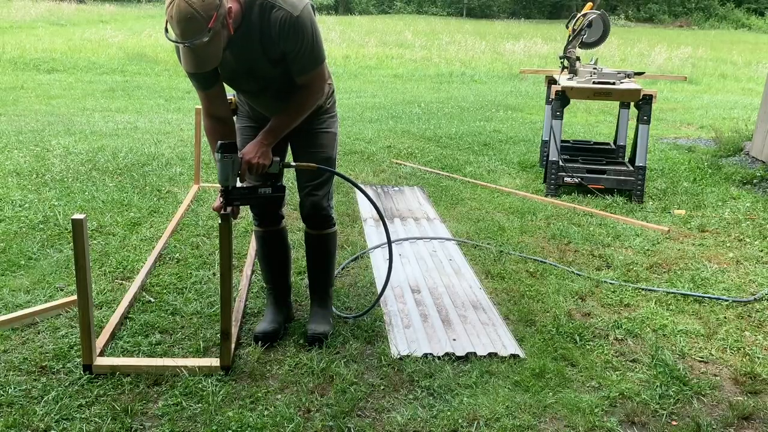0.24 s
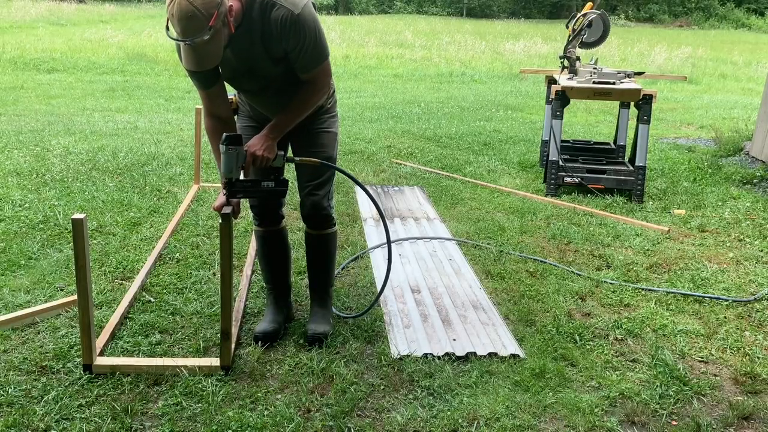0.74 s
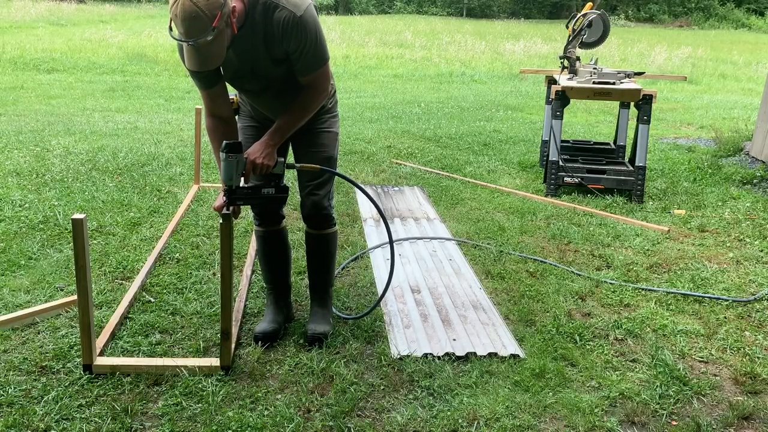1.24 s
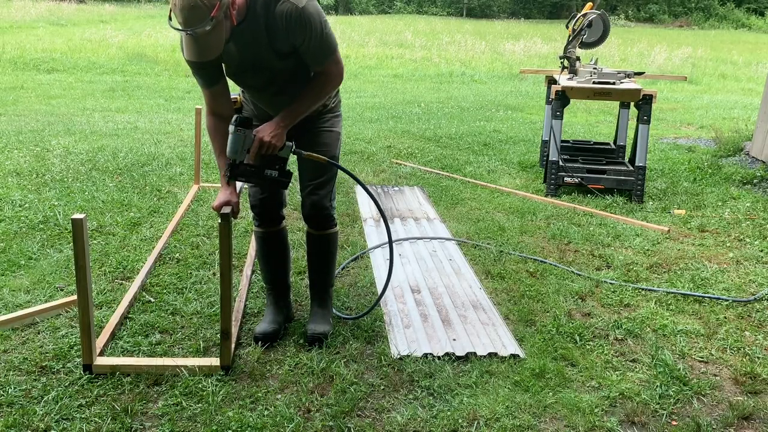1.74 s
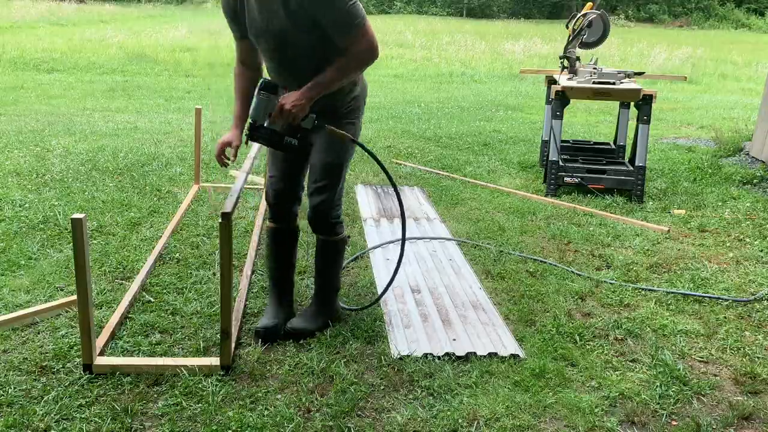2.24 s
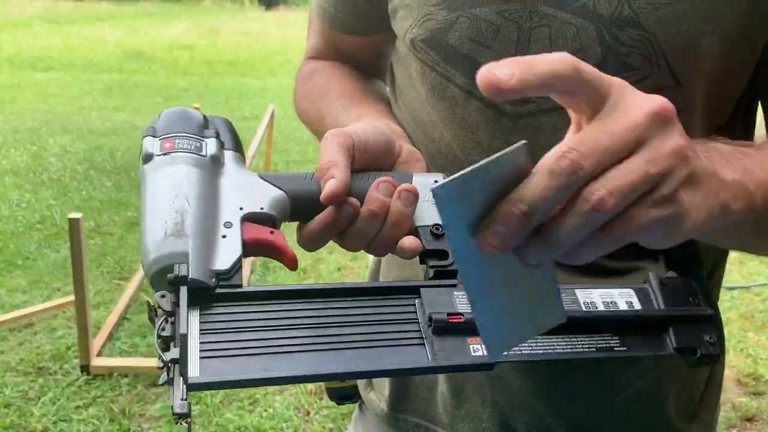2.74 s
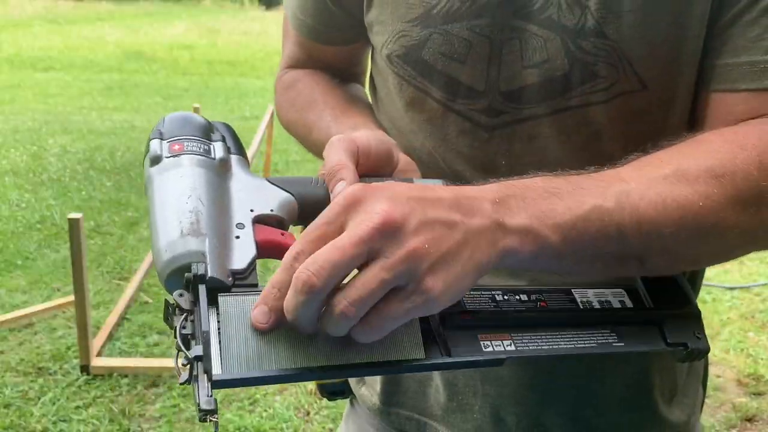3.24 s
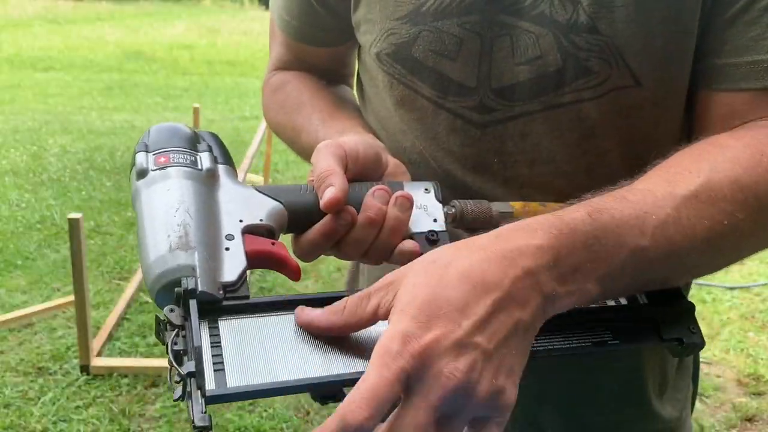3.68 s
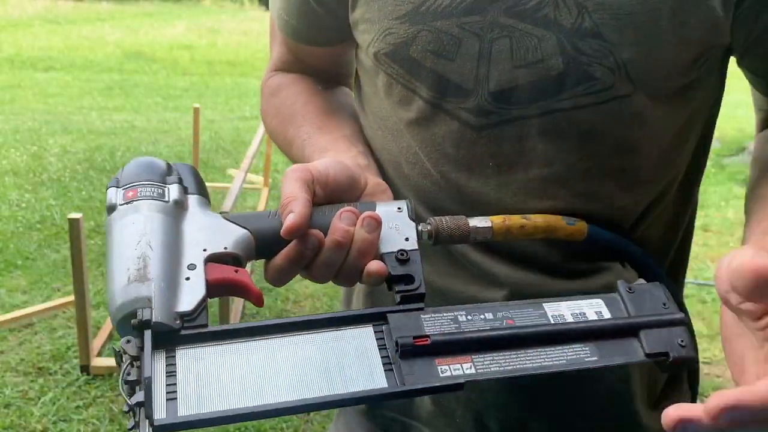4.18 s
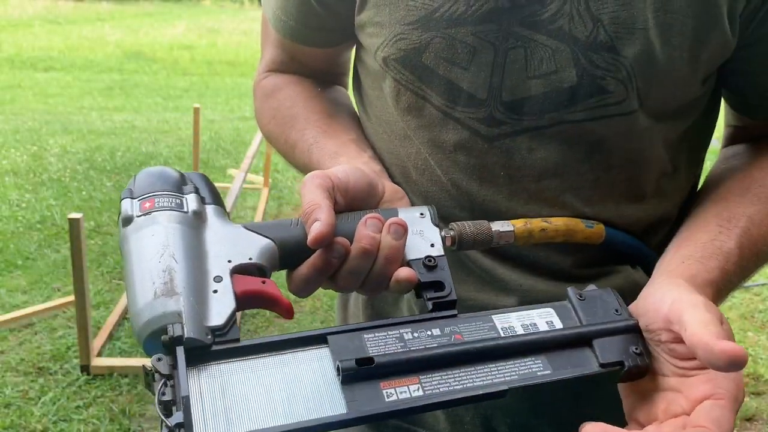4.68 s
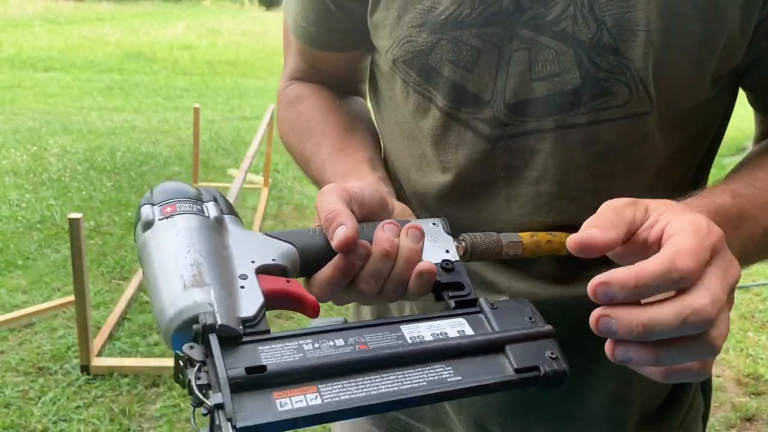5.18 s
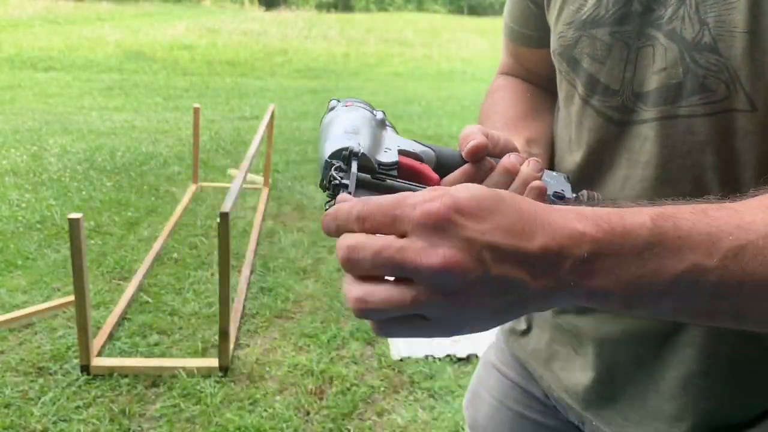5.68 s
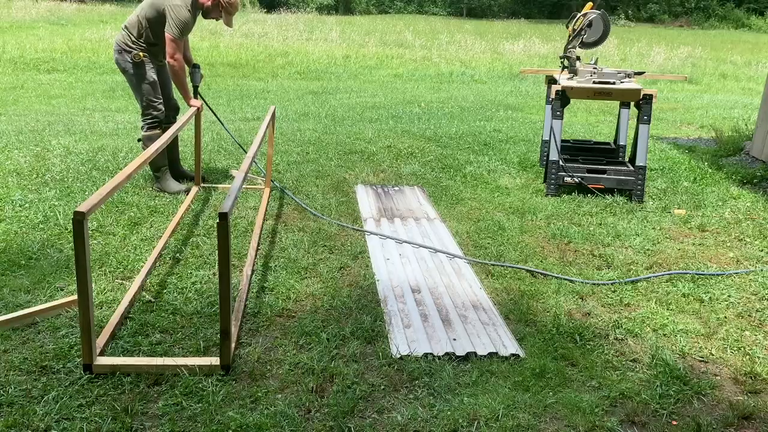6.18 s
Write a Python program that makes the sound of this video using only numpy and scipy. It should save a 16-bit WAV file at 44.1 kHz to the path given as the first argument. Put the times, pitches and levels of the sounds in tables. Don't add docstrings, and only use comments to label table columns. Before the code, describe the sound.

In a breezy open yard an air nailer fires twice into a thin wooden frame, about a second apart, each a crack and woody knock followed by a sharp burst of escaping air. A cut goes close to the tool over a low engine drone: a nail strip rattles in, snaps home, a catch clicks and the magazine slides shut with a slam. Faint birds chirp; then quieter open yard. Stereo microphone, buffeted by wind.

```python
import sys
import numpy as np
from scipy import signal
from scipy.fft import rfft, irfft, next_fast_len
from scipy.io import wavfile
from scipy.ndimage import map_coordinates

SR = 44100
rng = np.random.default_rng(int(sys.argv[2]) if len(sys.argv) > 2 else 0)


def boost(x):
    u = np.asarray(x, float) / 20
    return 10 ** u


def output_pcm(signal):
    pcm = np.clip(np.atleast_2d(signal).T, -1, 1) * 32767
    wavfile.write(sys.argv[1], SR, np.round(pcm).astype(np.int16))


N = 283195
T = np.arange(N) / SR
FIRST_FEED = [[1], [0]]

# (time [s], level [dB], half width [s])
PUFFS = [(.02, -50.5, 0.14), (.19, -39.5, 0.047), (.35, -46, 0.044), (0.449, -41, 0.026),
         (.605, -41, 0.017), (.87, -48, 0.045), (1.13, -56.5, 0.073), (1.27, -52, 0.034),
         (1.39, -46, 0.017), (1.5, -38, 0.043), (1.66, -44, .05), (1.86, -46.5, 0.023),
         (2.001, -48.5, 0.12), (2.44, -46.5, 0.05), (6.15, -62, 0.046)]
CALM_DB = -63.5
# (time [s], level [dB], pitch [Hz], t60 [s])
GUSTS = [
    (.075, -40, 105, .08),
    (.2, -34, 130, .05),
    (.212, -40, 215, .04),
    (1.85, -42, 85, .07),
    (2.025, -37, 90, .08),
    (2.035, -43, 170, .04),
    (2.37, -52, 300, .06),
]
# (time [s], level [dB])
BREEZE = [(0, 1.5), (.45, 0), (.95, 2.5), (1.2, 0), (1.5, 0), (1.95, -5), (2.25, -7.5), (2.4, -5.5),
          (2.65, -5), (2.95, 1), (3.4, 1), (4.2, 1), (4.9, 3.5), (5.3, 2), (5.75, 3.5), (6.42, 3.5)]
GRASS_SWAYS, ROAD_SWAYS, AIR_SWAYS = 0.868, 0.81, 1
# (from [s], leaves [dB], road [dB], grass [dB], air [dB])
BEDS = [
    (0, -60, -70.5, -71, -74.5),
    (2.5, -60, -61, -76.5, -76.5),
    (5.96, -64, -74, -72, -78),
]
# (frequency [Hz], level per Hz [dB])
RUMBLE = [(18, -43.5), (35, -3), (60, 6.5), (100, -2), (180, -17), (300, -23), (600, -53)]
LEAVES = [(60, -8.5), (150, -0.5), (350, -2), (500, -14), (1000, -39)]
ROAD = [(300, -21), (600, -2), (950, 1), (1300, -6.5), (1800, -10), (2600, -37.5)]
GRASS = [(500, -12.5), (1200, 5), (2600, 4.5), (4300, -8.5), (5500, -9), (8000, -20), (12000, -36.5)]
AIR = [(2500, -4.5), (5000, 5), (7000, -1.5), (9000, -3.5), (11000, -5.5), (13000, -14), (16000, -11.5)]
# (time [s], level [dB])
ENGINE = [(2.5, -52), (2.95, -51.5), (3.3, -43.5), (3.75, -42), (4.0, -42), (4.12, -50.5), (4.3, -40),
          (4.45, -48), (4.62, -42.5), (4.72, -49.5), (4.95, -41), (5.1, -44.5), (5.42, -42.5),
          (5.49, -52.5), (5.56, -42.5), (5.92, -48.5)]
# (pitch [Hz], width [Hz])
DRONE = (71.7, 6.7)
# (time [s], bass [dB], treble [dB])
DUCKS = [
    (.6, -15.5, -5),
    (1.64, -5, -4),
    (3.2, -1, -6),
    (4.78, -24, -17),
]
RECOVER_T60_S = 0.44
# (time [s], level [dB])
RETURNS = [
    (0.599, -46.5),
    (1.64, -48),
    (4.33, -60.5),
    (4.45, -64.5),
    (4.77, -57.5),
]
RETURN_T60_S = 0.94
# (level [dB], rise [s], hold [s], t60 [s])
SWISH = (-56, 0.2, 0.1, .25)
SWISH_S = 4.3

# (valve opens [s], valve [dB], blow [dB], trigger released [s], exhaust [dB])
SHOTS = [
    (0.433, -23, -11, .594, -17),
    (1.487, -22.5, -10, 1.631, -16),
]
STROKE_S = .0273
# (time [s], level [dB], hold [s], port snap [dB])
SPITS = [
    (0.597, -20.5, .02, -19),
    (1.629, -29, 0.028, -25),
]
# (frequency [Hz], width [Hz], level [dB])
FRAME = [(390, 110, -3), (980, 130, 2.5), (1600, 250, -3.5), (660, 120, -8), (2900, 200, -12)]
LATE_CYCLES = 1.3
# (frequency [Hz], width [Hz], level [dB])
PORT = [(2770, 47, -4.5), (3500, 83, -10.5), (4210, 69, -6), (4590, 68, -9), (5240, 26, -7), (5850, 41, -6),
        (7060, 43, -3.5), (7550, 49, -0.5)]
# (frequency [Hz], level per Hz [dB])
VALVE = [(300, -30), (1000, -16), (2600, -9), (3800, -12.5), (7000, -6), (9000, 4.5), (13000, -5.5),
         (16000, -4)]
CRACK = [(100, -6), (1000, -2), (2600, -4), (5200, -11.5), (8500, 4), (11000, -4.5), (16000, -7.5)]
YARD = [(100, -14.5), (350, -4), (700, -7), (1300, -7), (2600, 1.5), (5200, -4), (9000, -8.5),
        (16000, -14.5)]
EXHAUST = [(150, -16.5), (350, -14.5), (1200, -23), (2600, -2), (5200, -9.5), (9000, 6.5), (11000, 1),
           (16000, -1)]

# (time [s], peak [dB], hollow part [dB])
NUDGES = [
    (0.926, -45, -8),
    (0.935, -57, -1),
    (0.971, -50, -5),
    (1.092, -45.5, -27),
    (1.115, -40.5, -8),
    (1.1563, -49, -1),
    (1.248, -45, -9),
    (1.253, -42, -12),
    (2.2784, -62, -3.5),
]
NUDGE_T60_S, NUDGE_RING_DB = 0.044, -27.5
# (time [s], peak [dB], hollow part [dB], strip ring [dB])
RATTLES = [(2.864, -28.5, 2.5, -5.5), (2.9104, -37.5, -5.5, -2.5), (2.9706, -39, -1, -8),
           (2.979, -34, -2, -5), (3.0187, -44, 6, 4), (3.021, -42, -6, 1), (3.025, -29, -4, 3),
           (3.035, -33, 0.5, -38), (3.059, -33, -18, -2), (3.067, -46, 7, -18), (3.16, -34, 7, -16),
           (3.1815, -40, -40, -21), (3.1975, -29.5, -9, -32), (3.2022, -22, -4, -41),
           (3.148, -42, -6, -14.5), (3.189, -44, -19, -19)]
RATTLE_T60_S = 0.015
# (time [s], peak [dB], hollow part [dB])
CLICKS = [(3.6566, -13, -9.5), (4.2962, -26.5, -15), (4.3099, -13, -15), (4.329, -16, -6.5),
          (4.3445, -23.5, -9), (4.436, -29, -28), (4.4573, -29.5, -26), (4.462, -27, -32),
          (4.486, -40, -17), (4.5318, -34, -13), (4.539, -35, -8), (4.545, -40, -18), (4.552, -41, -14),
          (4.592, -31, -18), (4.601, -34, -7), (5.537, -46, 6.5), (5.868, -42, -27), (4.5117, -36, -27.5),
          (4.6204, -37, -6), (4.7238, -35, -16), (4.7298, -22.5, -9), (4.7762, -15.5, -4.5),
          (4.8048, -33.5, -9.5), (5.2625, -48, -15.5), (5.665, -38.5, -19)]
CLICK_T60_S, CLICK_RING_DB = 0.023, -28
# (time [s], bright [dB], hollow part [dB], length [s])
RUBS = [(2.228, -69, -11, 0.069), (2.57, -73.5, -19, 0.035), (2.664, -70.5, -15, 0.074),
        (2.741, -67.5, -22, 0.088), (2.912, -59, -8, 0.086), (3.068, -47, -7, 0.075),
        (3.133, -39.5, -21, 0.06), (3.578, -60.5, -7, 0.089), (3.852, -55.5, -10, 0.089),
        (4.364, -39, -10, .105), (4.503, -34, -12.5, 0.071), (4.581, -35, -22, 0.024),
        (4.668, -61, -22.5, .014), (5.163, -60.5, 15.5, 0.044), (5.505, -63.5, 17, 0.093),
        (5.59, -67, 9.5, 0.082), (5.855, -45, -15.5, 0.021)]
RUB_RISE, RUB_T60_S = 0.34, 0.022
# (time [s], bright [dB], hollow part [dB], length [s])
SCRAPES = [
    (2.986, -64, 6, 0.024),
    (3.23, -68, 3, 0.031),
    (3.637, -54.5, -20.5, .012),
    (3.679, -54, -4, 0.044),
    (4.299, -36.5, -2, 0.059),
    (4.48, -38, -19, 0.0068),
]
SCRAPE_RISE_S, SCRAPE_DIES = 0.0059, 2.75
# (time [s], bright [dB], hollow part [dB])
SLIDE = [
    (4.701, -65, 2),
    (4.715, -41, -2.5),
    (4.73, -24.5, -6),
    (4.76, -21, -1.5),
    (4.775, -20, -1.5),
    (4.788, -20, 4.5),
    (4.791, -54.5, 2),
    (4.815, -40.5, 3),
    (4.85, -72, 1),
]
# (time [s], level [dB], pitch [Hz], t60 [s])
STOP = [
    (4.7772, 5, 2600, .0014),
    (4.7845, -11, 1900, .004),
    (4.7872, -9, 3000, .003),
    (4.79, -15, 900, .006),
    (4.7775, -12, 1300, .006),
    (4.771, -16, 7150, .05),
    (4.783, -17, 6980, .03),
    (4.786, -24, 360, .025),
    (4.788, -20, 200, .03),
]
# (time [s], level [dB], pitch [Hz], t60 [s])
SEAT = [(3.657, -17, 1770, .03), (4.3103, -19, 4400, .025), (3.657, -16, 5610, .018),
        (3.657, -20, 6180, .03), (4.3103, -14, 5150, .04), (4.3103, -17, 7300, .02),
        (4.3103, -16, 6420, .025), (2.865, -38, 1950, .06), (3.026, -38, 1720, .03),
        (3.037, -40, 1800, .02), (3.161, -37, 1760, .025), (3.657, -18, 7000, .02), (4.329, -22, 1900, .03),
        (4.462, -27, 7100, .02), (4.329, -22, 5150, .05), (4.2965, -27, 4300, .02), (5.19, -56, 10200, .06),
        (5.665, -44, 6600, .015), (4.332, -30, 2500, .06), (4.345, -33, 2550, .09)]
# (frequency [Hz], level per Hz [dB])
STEEL = [(1500, -39), (4000, -19), (5800, -6), (7000, -1.5), (9000, 3), (11000, -1), (13000, -7.5),
         (16000, -7.5)]
SHELL = [(200, -23.5), (550, -15.5), (900, -7), (1700, -3.5), (2600, 1), (3800, -1.5), (6000, -11),
         (9000, -40.5)]
# (frequency [Hz], width [Hz], level [dB])
MAGAZINE = [(4300, 3300, -5.5), (5240, 34, 2.5), (6350, 18, -6), (7016, 57, 3), (8500, 250, 5),
            (11100, 149.5, -9.5), (11960, 78, -10)]
# (frequency [Hz], width [Hz], level [dB])
HOUSING = [(1017, 1900, -15), (1314, 91, 7), (1810, 260, 2.5), (2577, 56, 1)]
# (frequency [Hz], width [Hz], level [dB])
STRIP = [(9830, 45, 0), (10350, 70, -9)]
# (frequency [Hz], width [Hz], level [dB])
DRAG = [(1630, 220, -4.5), (4420, 300, -5.5), (5000, 220, -4), (5900, 220, -2.5), (7500, 230, -22),
        (10000, 150, 1)]

# (time [s], length [s], start [Hz], end [Hz], level [dB])
GLIDES = [(1.855, 0.021, 1910, 2250, -50), (3.787, 0.015, 4050, 3350, -59), (3.795, .065, 4400, 4750, -71),
          (3.862, 0.028, 3280, 3900, -56), (3.886, .022, 3900, 3500, -63), (4.012, .03, 5150, 5350, -61),
          (4.036, .017, 5350, 4450, -57), (4.06, .06, 5250, 5300, -70), (3.724, .036, 4600, 5000, -61),
          (3.756, .04, 4950, 4400, -63), (5.255, .025, 6950, 6850, -66), (6.12, .03, 2000, 2080, -66),
          (5.293, 0.075, 5250, 4980, -66), (5.431, .06, 5770, 5970, -63.5), (5.455, 0.046, 6150, 6240, -68),
          (5.552, .025, 4654, 4140, -57), (5.703, 0.079, 5670, 5970, -58), (5.759, 0.048, 6260, 6260, -66),
          (5.78, 0.08, 5764, 5800, -71), (5.84, 0.028, 3930, 3050, -62), (5.879, 0.085, 2837, 4770, -58.5),
          (5.882, 0.036, 3970, 4540, -58)]
# (time [s], length [s], top [Hz], end [Hz], level [dB])
ARCHES = [
    (3.914, .022, 4050, 3650, -56),
    (3.952, 0.046, 5300, 3350, -59.5),
]
ARCH_FROM = .87
# (time [s], level [dB], rise [s], hold [s], t60 [s])
INSECT = [
    (2.5, -62.5, 0.012, 0.022, 0.6),
    (3.3, -79.5, 0.053, 0.26, 0.27),
]

# (frequency [Hz], likeness [-1..1])
NEAR = [(300, 0.81), (1700, 0.75), (2500, 0.37), (3050, 0.67), (4000, 0.27), (5500, 0.071), (6800, 0.7),
        (7700, .8), (8250, .97), (8600, .997), (8900, .96), (9400, .82), (10200, .82), (10850, .995),
        (11400, .9), (12300, .68), (12900, .82), (13450, .995), (14000, .72), (14900, .68), (15500, .98),
        (16000, 0.99)]
# (frequency [Hz], likeness [-1..1])
FAR = [(100, 0.95), (350, 0.89), (1000, 0.053), (5500, 0.085), (7000, 0.68), (8600, 0.66), (9600, 0.95),
       (11000, 0.24), (12300, 0.54), (13500, 0.89), (16000, 0.96)]
# (frequency [Hz], likeness [-1..1])
STEADY = [(300, .75), (1500, .5), (2000, .6), (2450, .85), (2700, .93), (3400, .93), (3700, .3)]
# (frequency [Hz], lead [cycles])
LEAD = [(0, 0), (1000, -.08), (2200, -.2), (3050, -.5), (5500, -.5), (6150, 0), (8250, .48), (8850, .52),
        (10650, .99), (11250, 1.01), (13200, 1.48), (13700, 1.52), (15450, 1.99), (16500, 2)]
# (frequency [Hz], lead [cycles])
STEADY_LEAD = [(0, 0), (1500, -.2), (2000, -.33), (2450, -.44), (2700, -.46), (3450, -.5)]
# (frequency [Hz], level [dB])
TILT = [(300, 0), (2300, 0), (3600, 0), (5000, -4), (6500, -1), (8000, 0), (16000, 0)]
# (from [s], to [s], stretch of the port pattern with bearing [ratio])
HELD = [
    (.6, .76, 1.01),
    (1.644, 1.77, 1.06),
    (3.062, 3.198, .92),
]
# (from [s], to [s], low [Hz], high [Hz])
NULLS = [(.605, .66, 2750, 3350), (.66, .745, 3220, 3420), (.605, .63, 2200, 2400), (.63, .72, 2130, 2260),
         (.605, .64, 4480, 4680), (.605, .63, 4880, 5000), (1.648, 1.682, 2950, 3600),
         (1.682, 1.765, 3080, 3280), (1.648, 1.658, 4500, 5100), (1.648, 1.682, 5050, 5280),
         (1.68, 1.706, 5280, 5680), (3.064, 3.1, 2650, 3000), (3.095, 3.145, 2380, 2720),
         (3.14, 3.165, 2780, 3250), (3.158, 3.176, 3100, 3700), (3.172, 3.198, 2480, 2850),
         (3.87, 3.96, 2900, 3150), (4.365, 4.45, 5330, 5520), (4.367, 4.41, 12900, 13600),
         (4.39, 4.446, 13400, 14300), (4.73, 4.76, 5330, 5520), (2.922, 2.94, 3050, 3200),
         (3.72, 3.76, 2650, 2800)]
NULL_SKIRT_HZ = 70
# (from [s], to [s])
CLOSE = (2.5, 5.96)
# (time [s], half width [s], level [dB])
CUTS = [
    (2.501, 0.014, -16),
    (4.89, 0.0586, 1.5),
    (5.972, 0.015, -21),
]


def along(points, hz):
    f, v = np.transpose(points)
    return np.interp(np.log(hz + 1), np.log(f + 1), v)


def unit(x):
    return x / np.sqrt(np.mean(x ** 2) + 1e-20)


def curves(rows):
    s, *cols = np.transpose(rows)
    return [np.interp(T, s, c) for c in cols]


def wobble(rate):
    return map_coordinates(rng.standard_normal(int(N * rate / SR) + 4), [T * rate])


def filtered(x, response):
    m = next_fast_len(N + 8192)
    return irfft(rfft(x, m) * response(np.fft.rfftfreq(m, 1 / SR)), m)[..., :N]


def power_one(gain):
    return gain / np.sqrt(np.mean(np.abs(gain) ** 2))


def colour(points):
    return lambda hz: power_one(boost(along(points, hz)))


def modes(table):
    def response(f):
        total = 0
        for k, (centre, width, db) in enumerate(table):
            damping = 1j * f * width
            total = total + (-1) ** k * boost(db) * damping / (centre * centre - f * f + damping)
        return power_one(total)
    return response


def noise(envelope, response, grain_db=0, grain_hz=900):
    grain = unit(boost(grain_db * wobble(grain_hz)))
    return filtered(envelope * grain * rng.standard_normal((2, N)), response)


def burst(s, db, rise, hold, t60):
    out, first = np.zeros(N), int(s * SR)
    t = T[first:first + int((rise + hold + 2 * t60) * SR)] - s
    fall = np.clip(t - rise - hold, 0, 9)
    out[first:first + len(t)] = boost(db - 60 * fall / t60) * np.clip(t / rise, 0, 1)
    return out


def thud(s, db, hz, t60, rise=0.00046):
    return burst(s, db, rise, 0, t60) * np.sin(2 * np.pi * hz * (T - s))


def field():
    close = np.clip(np.minimum(T - CLOSE[0], CLOSE[1] - T) / 0.011, 0, 1)
    engine = close * boost(curves(ENGINE)[0])
    puffs = boost(CALM_DB) + sum(boost(db) * np.exp(-((T - s) / width) ** 2) for s, db, width in PUFFS)
    start, *levels = np.transpose(BEDS)
    leaves_db, road_db, grass_db, air_db = [db[np.searchsorted(start[1:], T)] for db in levels]
    breeze_db, = curves(BREEZE)
    duck, hiss_duck = boost(sum(np.c_[db] * burst(s, 0, 0.033, 0.092, RECOVER_T60_S) for s, *db in DUCKS))
    returns = sum(burst(s, db, 0.019, 0.018, RETURN_T60_S) for s, db in RETURNS)

    rumble = (puffs + 0.26 * engine * duck) * noise(boost(0.86 * wobble(11.0)), colour(RUMBLE))
    drone = 0.94 * engine * duck * noise(0.83, modes([(*DRONE, 0)]))
    gusts = sum(thud(*row, rise=0.017) for row in GUSTS) * FIRST_FEED
    leaves_db = leaves_db + breeze_db - 1.5 + 1.7 * wobble(11) + 2.1 * wobble(22)
    leaves = noise(duck * boost(leaves_db), colour(LEAVES))
    road_db = road_db + ROAD_SWAYS * breeze_db + 2.0 + 2.4 * wobble(12)
    road = noise(duck * boost(road_db), colour(ROAD))
    grass_db = grass_db + GRASS_SWAYS * breeze_db + 9.0 + 0.74 * wobble(5.4)
    grass = noise(hiss_duck * boost(grass_db) + burst(SWISH_S, *SWISH), colour(GRASS))
    air_db = air_db + AIR_SWAYS * breeze_db + 9 + 0.98 * wobble(13)
    air = noise(boost(air_db) + returns, colour(AIR))
    return rumble + drone + gusts + leaves + road + grass + air


def nailer():
    hits = [(opens + STROKE_S, db) for opens, _, db, *_ in SHOTS]
    dumps = [row[-2:] for row in SHOTS]

    valve = sum(burst(opens, db, .003, .024, .03) for opens, db, *_ in SHOTS)
    rush = sum(burst(s - .009, db - 13.0, 0.0078, 0.0041, .01) for s, db in hits)
    blow = sum(burst(s, db - 2.5, .003, .0065, .014) for s, db in hits)
    sink = (.004, .006, .012)  # rise, hold, t60 [s]
    knock = sum(burst(s + .001, db - 16, *sink) for s, db in hits)
    frame = 0
    for s, db in hits:
        for hz, _, level in FRAME:
            swing = np.sin(2 * np.pi * (hz * (T - s) + rng.random()))
            frame = frame + burst(s + LATE_CYCLES / hz, db - 8.5 + level, *sink) * swing
    jolt = sum(thud(s + 0.0091, db - 7.5, 210.6, 0.021) for s, db in hits)
    echo = sum(burst(s + 0.0096, db - 17.0, 0.0088, 0.0084, 0.26) for s, db in hits)
    leak = sum(burst(s + 0.013, db - 30.5, .004, .01, 0.9) for s, db in hits)

    trigger = sum(burst(s - .012, db - 20.5, 0.0025, 0.0057, .02) for s, db in dumps)
    snap = sum(burst(s, db, 0.0023, 0.0014, 0.028) for s, *_, db in SPITS)
    spit = sum(burst(s, db, .002, hold, .02) for s, db, hold, _ in SPITS)
    dump = sum(burst(s, db, 0.002, 0.018, .2) for s, db in dumps)
    dump = dump + sum(burst(s, db - 13.5, 0.0028, 0.01, 0.38) for s, db in dumps)
    dump = dump + sum(burst(s, db - 34.0, .003, 0.085, 0.5) for s, db in dumps)
    back = sum(burst(s, db - 20.5, .002, .05, 0.037) for s, db in dumps)
    pop = sum(thud(s + 0.00091, db - 3.5, 310, 0.016) for s, db in dumps)
    pop = pop + sum(thud(s + 0.0062, db - 10.5, 70, 0.055, rise=0.003) for s, db in dumps)
    reseat = sum(thud(s + 0.032, db - 19.5, hz, 0.012, rise=0.0012) for s, db in dumps for hz in (330, 900))

    crack = noise(blow + snap, colour(CRACK), grain_db=1.5)
    air = noise(spit, modes([(10050, 1200, 0)]), 3.0)
    air = air + noise(boost(-12.5) * dump, modes(PORT))
    air = air + noise(rush, modes([(3800, 2200, 0)]), 1.5)
    air = air + noise(trigger, modes([(6850, 810, 0)]))
    air = air + noise(valve + leak, colour(VALVE), 2.0)
    air = air + noise(dump, colour(EXHAUST), grain_db=1.5, grain_hz=297.6)
    wood = noise(knock + back, modes(FRAME), 1.0) + noise(echo, colour(YARD), 1.1)
    return air + wood + crack + (pop + jolt + reseat + frame) * FIRST_FEED


def body(bright, hollow, grain_db, ring_db, box_db):
    def steel(hz):
        return np.hypot(colour(STEEL)(hz), boost(ring_db) * np.abs(modes(MAGAZINE)(hz)))

    def shell(hz):
        return colour(SHELL)(hz) + boost(box_db) * modes(HOUSING)(hz)

    return noise(bright, steel, grain_db) + noise(hollow, shell, grain_db)


def ticking():
    ticks = [(*row, NUDGE_RING_DB, NUDGE_T60_S) for row in NUDGES]
    ticks += [(*row, RATTLE_T60_S) for row in RATTLES]
    ticks += [(*row, CLICK_RING_DB, CLICK_T60_S) for row in CLICKS]
    bright = hollow = ring = contact = 0
    for s, db, low_db, ring_db, t60 in ticks:
        bright = bright + burst(s - .0005, db - 1.5, 0.0006, 0.0018, t60)
        hollow = hollow + burst(s - .0005, db + low_db - 7.5, 0.0012, 0.00083, 2.0 * t60)
        ring = ring + burst(s - .0005, db + ring_db, 0.00057, 0.0013, t60)
        contact = contact + burst(s - .0001, db - 8.5, .0001, .0001, 0.0032)
    sound = body(bright, hollow, grain_db=0.5, ring_db=-2.5, box_db=0.5)
    return sound + noise(contact, colour(CRACK)) + noise(ring, modes(STRIP))


def rubbing():
    strokes = [(s, db, low_db, RUB_RISE * length, (1 - RUB_RISE) * length, RUB_T60_S)
               for s, db, low_db, length in RUBS]
    strokes += [(s, db, low_db, SCRAPE_RISE_S, length, SCRAPE_DIES * length)
                for s, db, low_db, length in SCRAPES]
    slide_db, slide_low_db = curves(SLIDE)
    sliding = (T > SLIDE[0][0]) & (T < SLIDE[-1][0])
    bright = sliding * boost(slide_db + 3.0)
    hollow = sliding * boost(slide_db + slide_low_db)
    for s, db, low_db, *shape in strokes:
        bright = bright + burst(s, db + 2.0, *shape)
        hollow = hollow + burst(s, db + low_db, *shape)
    stick = unit(boost(2.2 * wobble(170)))
    loose = (T > CLOSE[0]) * (T < CLICKS[0][0])
    sound = body(stick * bright, stick * hollow, grain_db=0.5, ring_db=-12.5, box_db=-19.5)
    return sound + noise(stick * bright * loose, modes(DRAG), 1.6)


def seating():
    return sum(thud(*row) for row in STOP + SEAT) * FIRST_FEED


def birds():
    song = np.zeros(N)
    calls = [(s, length, a, (a + b) / 2, b, db) for s, length, a, b, db in GLIDES]
    calls += [(s, length, ARCH_FROM * top, top, b, db) for s, length, top, b, db in ARCHES]
    for s, length, *hz, db in calls:
        u = np.arange(int(length * SR)) / (length * SR)
        pitch = np.polyval(np.polyfit([0, .5, 1], hz, 2), u)
        whistle = np.sqrt(np.sin(np.pi * u)) * np.sin(2 * np.pi * np.cumsum(pitch) / SR)
        song[int(s * SR):][:len(u)] += boost(db + 7.5) * whistle
    trees = boost(-16.5 - 60 * T[:8000] / .25) * rng.standard_normal((2, 8000)) / 20
    buzz = noise(sum(burst(*row) for row in INSECT), modes([(4200, 280, 0)]))
    broken = boost(3.5 * wobble(160) - 3)
    direct = song * broken * [[1], [-.4]]
    return direct + signal.fftconvolve(song[None], trees, axes=1)[:, :N] + buzz


def ports(pair, alike, lead=LEAD):
    def spread(hz):
        turn = np.arccos(np.clip(along(alike, hz), -1, 1)) / 2
        return np.array([np.cos(turn), np.sin(turn)])

    def offset(hz):
        half = boost(along(TILT, hz) / 2) * np.exp(-1j * np.pi * np.interp(hz, *np.transpose(lead)))
        return np.array([half, 1 / half])

    mid, side = filtered(pair, spread)
    return filtered(np.array([mid + side, mid - side]), offset)


def stretched(points, ratio):
    return [(ratio * hz, v) for hz, v in points]


def cancel_nulls(both):
    for a, b, low, high in NULLS:
        cut = slice(int((a - .05) * SR), int((b + .05) * SR))
        mid = both[:, cut].mean(axis=0)
        hz = np.fft.rfftfreq(len(mid), 1 / SR)
        inside = (hz > low - NULL_SKIRT_HZ) * (hz < high + NULL_SKIRT_HZ)
        band = irfft(rfft(mid) * inside, len(mid))
        both[:, cut] -= np.clip(np.minimum(T[cut] - a, b - T[cut]) / .006 + 1, 0, 1) * band
    return both


def scene():
    surroundings = field()
    tool = nailer() + ticking() + rubbing() + seating()
    surroundings = surroundings + birds()
    both = ports(surroundings, FAR)
    passing = 1
    for a, b, ratio in HELD:
        held = np.clip(np.minimum(T - a, b - T) / .003, 0, 1)
        alike = stretched(STEADY, ratio) + NEAR[4:]
        lead = stretched(STEADY_LEAD, ratio) + LEAD[4:]
        both = both + ports(held * tool, alike, lead)
        passing = passing - held
    both = both + ports(passing * tool, NEAR)
    return cancel_nulls(both)


def roll_off(x):
    return signal.sosfilt(signal.butter(12, 17130, fs=SR, output="sos"), x)


def record(dry):
    fade = boost(sum(db * np.exp(-((T - s) / width) ** 2) for s, width, db in CUTS))

    def band(hz):
        treble = np.interp(hz, [15720, 16050, 16900, 17000], [1.0, 0.0, 0.0, 0])
        return treble * hz ** 2 / (hz ** 2 + 20.0 ** 2)

    mix = filtered(dry * fade, band)
    mix = mix / (1 + np.abs(mix / .9) ** 4) ** (1 / 4)
    return roll_off(mix)


dry = scene()
out = record(dry)
output_pcm(out)
```